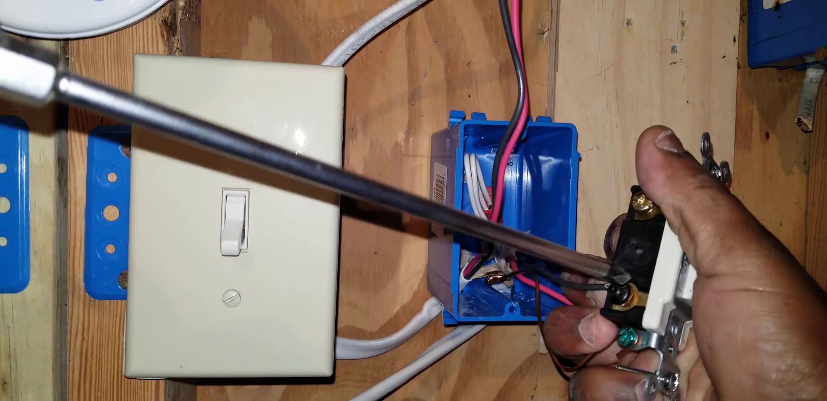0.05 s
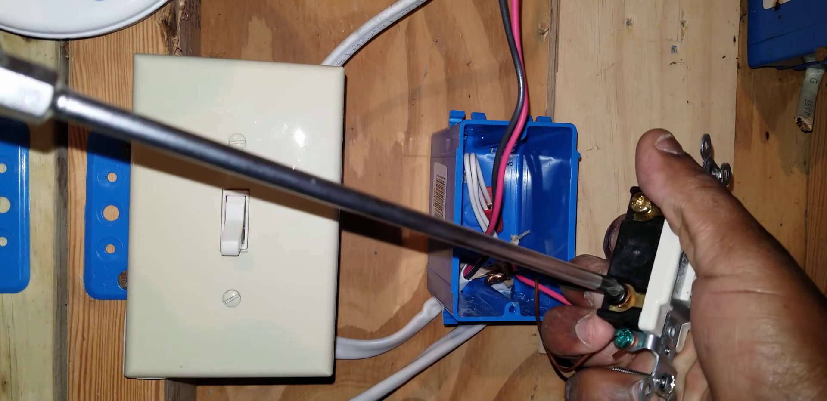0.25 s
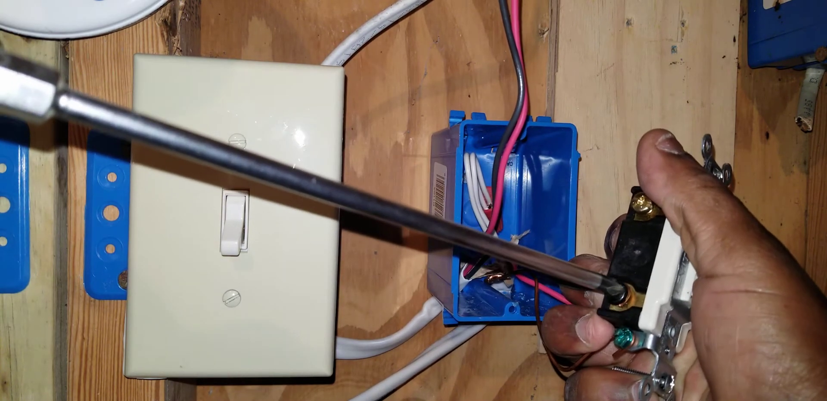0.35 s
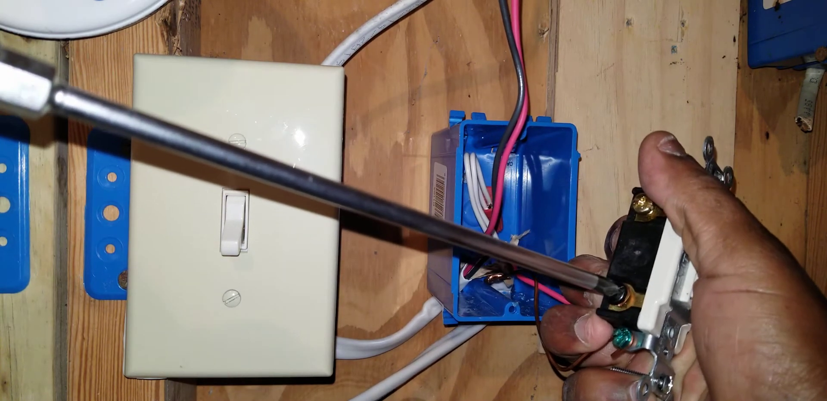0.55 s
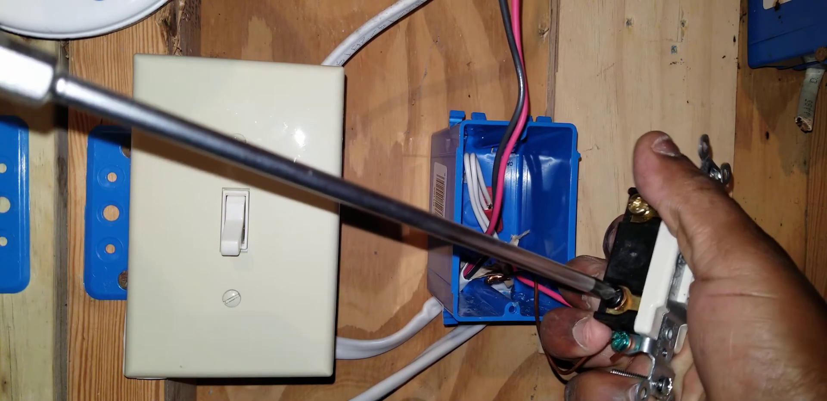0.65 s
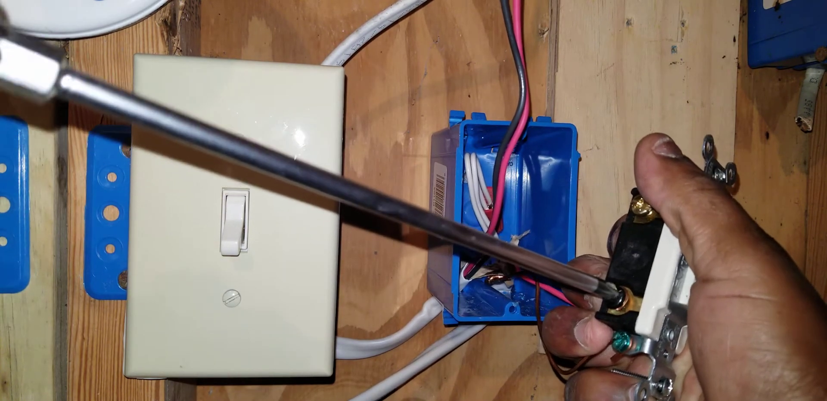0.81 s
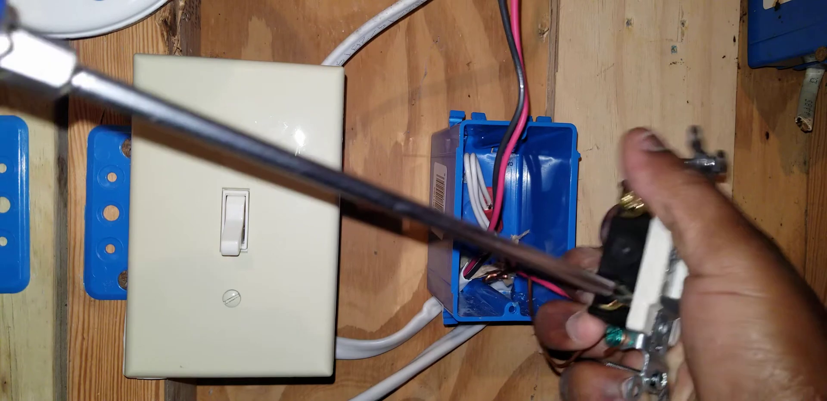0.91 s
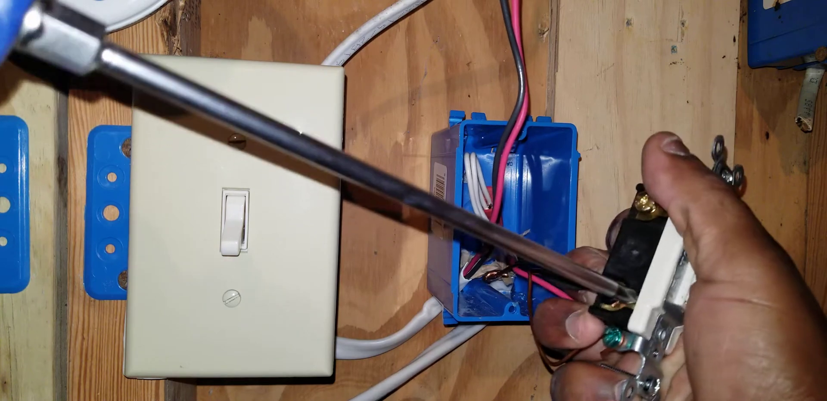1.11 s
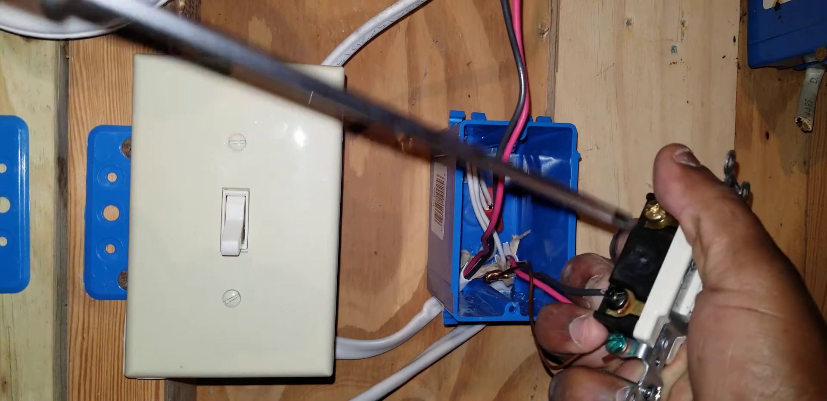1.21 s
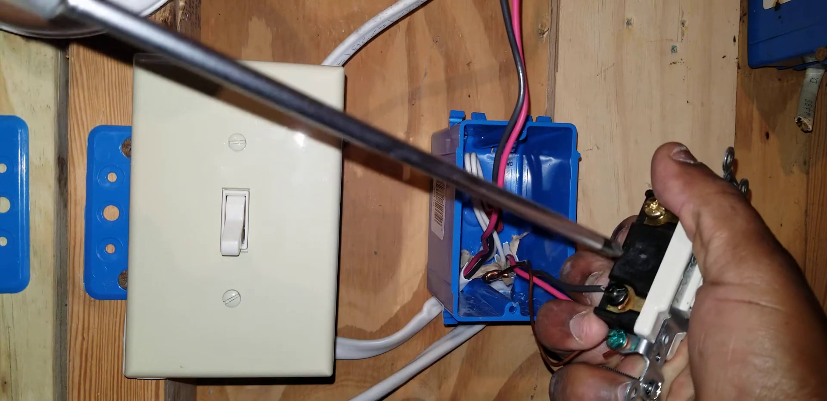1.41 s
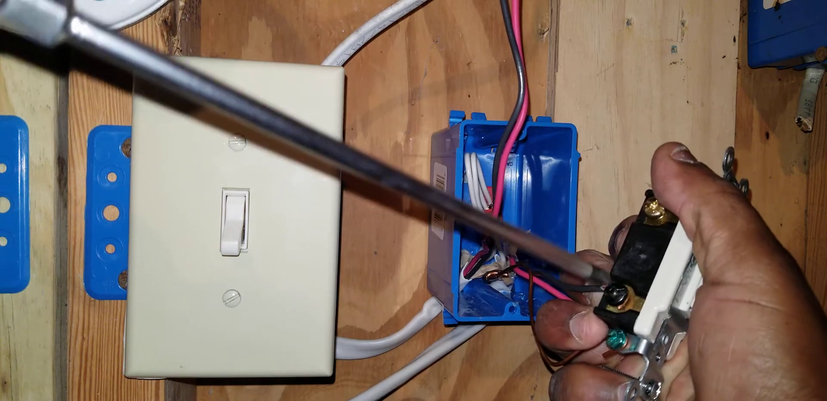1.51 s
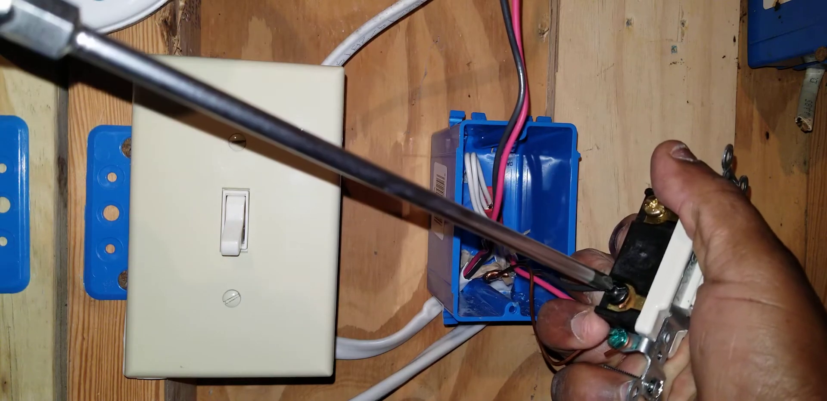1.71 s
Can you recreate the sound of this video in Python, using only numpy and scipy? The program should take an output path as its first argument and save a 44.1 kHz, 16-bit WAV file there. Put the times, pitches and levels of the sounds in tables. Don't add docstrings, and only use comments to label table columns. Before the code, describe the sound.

A screwdriver tip ticks and scrapes on a switch's brass screw, then knocks loudly, over low hum.

```python
import sys
import numpy as np
from scipy import signal
from scipy.fft import rfft, irfft, next_fast_len
from scipy.io import wavfile
from scipy.ndimage import map_coordinates

SR = 44100
rng = np.random.default_rng(int(sys.argv[2]) if len(sys.argv) > 2 else 0)


def undo_db(level):
    steps = np.asarray(level, float) / 20
    return 10 ** steps


def store_wav(level_fs):
    pcm = np.round(np.clip(np.atleast_2d(level_fs), -1, 1) * 32767)
    wavfile.write(sys.argv[1], SR, pcm.T.astype(np.int16))


N = 77175

# multiple of the shaft rate, level in dB rms.
SHAFT_ORDERS = [(2, -46.5), (3, -48.5), (4, -49.5), (5, -48), (6, -60.5), (7, -58.5), (9, -69.5),
                (10, -69.5)]
SHAFT_HZ = 25.23
SWAY_DB, SWAY_RAD, SWAY_PER_S = 2.5, 0.6, 9
# frequency in Hz, density in dB per Hz.
AIR_COLOUR = [(13, -53.5), (22, -6), (38, -7), (129, -15), (156, -25), (260, -29), (304, -30), (366, -30.5),
              (900, -49), (1170, -94), (1980, -120)]
# frequency in Hz, density in dB per Hz.
HISS_COLOUR = [(530, -34.5), (900, -15), (956, -12.5), (1920, -5.5), (2140, -8), (4460, -18.5), (5220, -11),
               (8550, -26), (13000, -14), (16000, -16)]
AIR_DB, HISS_DB = -41.5, -70
# centre in Hz, width in Hz, level in dB.
WHINE_BANDS = [(2200, 450, -78), (5550, 900, -82.5)]
# frequency in Hz, correlation from 0 to 1.
LIKENESS = [(60, 0.92), (180, 0.78), (550, 0.56), (1650, 0.08), (4970, 0.08), (15000, 0.13)]

# start in seconds, peak level in dB, body pitch in Hz, brightness in dB,
# left over right in dB.
TIP_TICKS = [(0.1882, -36, 2120, -12, 3.5), (0.191, -33.5, 3230, -22, 1), (0.193, -49.5, 4310, -30, 7),
             (0.1908, -40.5, 7460, -20, -4), (0.1997, -45, 1960, -2, 6), (0.3445, -45, 3120, -3, 4),
             (0.3761, -36.5, 1730, 2, 6), (0.378, -39, 2440, -10, 11), (0.3777, -37, 3520, -3, -4),
             (.379, -53, 4900, -10, 2), (0.3782, -39, 7340, -30, -6), (0.4063, -37.5, 10380, -6, 13),
             (.4072, -28, 3200, 1, 0.5), (0.4067, -42, 5550, -32, 1), (.409, -39.5, 3890, 5.5, 12),
             (.627, -65, 3720, 11.5, 8), (0.632, -52.5, 4200, 13, -2.5), (.948, -50, 6800, 6, -3),
             (0.9751, -42.5, 7360, 7, -3), (1.0129, -42, 3450, 10, -4), (1.1126, -49.5, 6160, 6.5, -5),
             (1.1189, -47.5, 1810, 0.5, 7), (1.1454, -40.5, 1970, -22, 5), (1.1465, -41.5, 11700, -15, 14),
             (1.1479, -33.5, 3294, -29, -10), (1.1471, -40, 6220, -30, 13), (1.1512, -38, 3500, -15, 4),
             (1.5329, -45, 1530, -18, 9), (1.5321, -29, 2040, -22, -1)]
# start in seconds, peak level in dB,
# body pitch in Hz, brightness in dB, left over right in dB.
SLOT_JUMP = [(.732, -44, 850, -11, -6), (0.8061, -39.5, 1080, -13.5, 5), (.806, -49, 2570, -13.5, 7),
             (0.8723, -26, 1540, -15.5, 2), (0.8743, -15, 1950, -10, 3), (.8752, -17.5, 3000, 5, 1.5),
             (0.8764, -19, 1560, 3.5, -1.5), (0.8816, -9, 2095, -16, 6.5), (0.8834, -22, 1810, -3.5, 1.5),
             (0.8857, -18.5, 1400, 6, -3), (0.8878, -25.5, 2110, 5.5, 0.5), (0.8936, -24, 11700, -2.5, 0.5),
             (.8974, -29, 13500, -3, 4.5)]
# frequency in Hz, level in dB, 60 dB decay in seconds.
BRASS_MODES = [(4200, -15.5, 0.004), (5870, -4.5, 0.0095), (7280, -11, 0.028), (9900, -8.5, 0.016),
               (11610, -7, 0.015), (13500, -12.5, .004)]
TICK_T60_S, JUMP_T60_S = 0.012, 0.008
BODY_RISE_S = 0.00092
CHATTER, BODY_CHATTER_S, BRASS_CHATTER_S = 0.042, 0.0013, 0.0019
CRACK_DB, CRACK_T60_S = -1, 0.012
KNOCK_DB, KNOCK_WIDTH = -3.5, 0.99
UNLIKE = 1
BLUR, BRASS_BLUR = 0.3, 0.12

# start in seconds, level in dB, dullness corner in Hz.
BENCH_BLOWS = [(0.189, -42, 1500), (.406, -37.5, 1492), (0.648, -45.5, 1200), (0.733, -47.5, 2500),
               (0.8051, -45, 3500), (0.874, -21, 1500), (.881, -17.5, 1500), (.886, -16.5, 2500),
               (0.8925, -21.5, 700), (1.147, -43.5, 1504), (1.533, -47.5, 3000)]
# frequency in Hz, level in dB, 60 dB decay in seconds.
BENCH_MODES = [(253, -5, 0.042), (315, -4.5, .05), (527.5, -5, 0.04), (665, 1.5, 0.037), (854, -2, 0.026),
               (1270, -10.5, 0.024)]

# start in seconds, length in seconds, level in dB, pitch in Hz,
# brightness in dB.
TIP_SCRAPES = [
    (0.341, 0.035, -59, 2200, -24),
    (0.503, 0.041, -61, 3300, -13),
    (0.867, 0.014, -42, 1480, -11),
    (1.116, 0.043, -51, 1980, -12),
    (1.127, 0.018, -48, 3330, -4),
]

# frequency in Hz, width in Hz, level in dB.
SQUEAK_MODES = [(1900, 70, -9.5), (3050, 28, -1.5), (3930, 50, -5.5), (5700, 47, -10.5)]
SQUEAK_START_S, SQUEAK_LENGTH_S, SQUEAK_DB = 0.57, 0.02, -56

# time in seconds, thin hiss in dB, dull rub in dB.
FINGER_SLIDE = [
    (.635, -82.5, -69),
    (.68, -77, -67),
    (.705, -58, -64.5),
    (.728, -56, -60.5),
    (.75, -61, -60),
    (.78, -66, -60.5),
    (.82, -68.5, -61),
    (.868, -67.5, -66.5),
]
# frequency in Hz, density in dB per Hz.
SKIN_COLOUR = [(8000, -32), (10500, -14.5), (13500, -4), (15800, -13.5)]
# frequency in Hz, density in dB per Hz.
RUB_COLOUR = [(500, -8.5), (1000, 1.5), (2500, -5.5), (5700, -6), (7000, -11.5), (11000, -15),
              (15000, -18.5)]

# frequency in Hz, level in dB, 60 dB decay
# in seconds.
BOOM_MODES = [(51.1, -20.5, 0.15), (158.6, -43.5, .12), (173.9, -32.5, 0.6), (670, -28, 0.046),
              (843, -27, .04), (3000, -42, .08), (11700, -49.5, 0.11)]
BOOM_START_S, BOOM_PAN_DB = 0.884, -1

# frequency in Hz, 60 dB decay in seconds.
ROOM_T60 = [(150, 0.5), (500, 0.2), (1200, .25), (2500, 0.29), (7000, 0.24), (10000, 0.22), (15000, 0.66)]
# frequency in Hz, level in dB.
ROOM_TONE = [(100, -4), (400, 1.5), (800, 2), (2000, -4), (5000, 0.5), (9000, 1), (15000, -6)]
ROOM_DB = -8

# frequency in Hz, difference in dB.
CLOSE_SHADE = [(250, -1.5), (600, -1), (1500, 2), (2800, -2), (5000, 0), (7500, 7.5), (11000, 9),
               (15000, 5.5)]
HANDS_LAG_S, BENCH_LAG_S = 0.00003, 0.00021
DIP_HZ, DIP_WIDTH_HZ, DIP = 1080, 290, 0.53
LOW_HZ, TOP_HZ = 40.5, 15800
START_S, START_SHARE, STOP_S = 0.003, 0.4, 0.004


def unit(x):
    return x / np.sqrt(np.mean(x ** 2) + 1e-20)


def along(points, hz):
    f, v = np.transpose(points)
    return np.interp(np.log(hz + 1), np.log(f + 1), v)


def wobble(rate):
    return map_coordinates(rng.standard_normal(400), [np.arange(N) * rate / SR])


def filtered(x, response):
    m = next_fast_len(x.shape[-1] + 8192)
    return irfft(rfft(x, m) * response(np.fft.rfftfreq(m, 1 / SR)), m)[..., :x.shape[-1]]


def coloured(shape, colour):
    return filtered(rng.standard_normal(shape), lambda f: undo_db(along(colour, f)))


def peak(f, hz, width_hz):
    return 1j * f * width_hz / (hz * hz - f * f + 1j * f * width_hz)


def rush(gain):
    def mid_side(hz):
        turn = np.arccos(np.clip(along(LIKENESS, hz), -1, 1)) / 2
        return gain(hz) * np.array([np.cos(turn), np.sin(turn)])

    mid, side = filtered(rng.standard_normal((2, N)), mid_side)
    return unit(np.array([mid + side, mid - side]))


def add(out, s, sound, pan_db, right=None, echo=None, lag_s=HANDS_LAG_S):
    def matched(x):
        return sound if x is None else x * np.linalg.norm(sound) / np.linalg.norm(x)

    parts = [undo_db(pan_db / 2) * sound, undo_db(-pan_db / 2) * matched(right), matched(echo)]
    for row, part, late in zip(out, parts, (0, lag_s, 0)):
        at = round((s + late) * SR)
        row[at:at + len(sound)] += part


def rings(modes, t, scatter_db):
    total = 0
    for hz, db, t60 in modes:
        decay = undo_db(db + scatter_db * rng.standard_normal() - 60 * t / t60)
        pitch = hz * (1 + 0.01 * rng.standard_normal())
        total = total + decay * np.sin(2 * np.pi * pitch * t)
    return total


def shortened(modes, share):
    return [(hz, db, t60 * share) for hz, db, t60 in modes]


def hum():
    t = np.arange(N) / SR
    tones = 0
    for order, db in SHAFT_ORDERS:
        level = undo_db(db + 4.5 + SWAY_DB * wobble(SWAY_PER_S))
        phase = 2 * np.pi * (order * SHAFT_HZ * t + rng.random()) + SWAY_RAD * wobble(SWAY_PER_S)
        tones = tones + level * np.sin(phase)
    air = undo_db(AIR_DB) * rush(lambda f: undo_db(along(AIR_COLOUR, f)))
    hiss = undo_db(HISS_DB) * rush(lambda f: undo_db(along(HISS_COLOUR, f)))
    whine = sum(undo_db(db) * rush(lambda f: abs(peak(f, hz, w)) ** 2) for hz, w, db in WHINE_BANDS)
    return tones + air + hiss + whine


def struck(ring, span_s, t):
    grains = np.clip(rng.standard_normal(len(t)) ** 3, -5, 5)
    blows = CHATTER * grains * np.exp(-(t / span_s) ** 2) + (t == 0)
    return signal.fftconvolve(blows, ring)[:len(t)]


def brass(t):
    crack = undo_db(CRACK_DB - 60 * t / CRACK_T60_S) * rng.standard_normal(len(t))
    return struck(rings(BRASS_MODES, t, 3) + crack, BRASS_CHATTER_S, t)


def knock(hz, t60, rise, t):
    noise = filtered(rng.standard_normal(len(t)), lambda f: peak(f, hz, KNOCK_WIDTH * hz) ** 2)
    return undo_db(KNOCK_DB - 60 * t / t60) * unit(noise) / 2 * rise


def ticks():
    out, t = np.zeros((3, N + SR)), np.arange(2000) / SR
    rise = 1 - np.exp(-t / BODY_RISE_S)
    touches = [(row, TICK_T60_S) for row in TIP_TICKS] + [(row, JUMP_T60_S) for row in SLOT_JUMP]
    for (s, db, hz, bright_db, pan_db), t60 in touches:
        shell = [(hz, 0, t60), (hz * 0.76, -8, t60 * 0.66), (hz * 1.339, -10, t60 * 0.5)]
        body = struck(rings(shell, t, 1) * rise + knock(hz, t60, rise, t), BODY_CHATTER_S, t)
        top = np.abs(body).max()
        other = signal.hilbert(body).imag * rng.choice([-1, 1]) + knock(hz, t60, rise, t) * top
        echo = rings(shortened(shell, BLUR), t, 1) + knock(hz, t60, rise, t)
        add(out, s, undo_db(db) * body / top, pan_db, right=body + UNLIKE * other, echo=echo)
        bright = brass(t)
        add(out, s, undo_db(db + bright_db) * bright / np.abs(bright).max(), pan_db,
            right=bright * 0.18 + brass(t), echo=rings(shortened(BRASS_MODES, BRASS_BLUR), t, 1))
    return out[:, :N]


def bench():
    out, t = np.zeros((3, N + SR)), np.arange(SR // 8) / SR
    for s, db, dull_hz in BENCH_BLOWS:
        push = t[:400] * np.exp(-2 * np.pi * dull_hz * t[:400])
        slap = 3 * undo_db(-60 * t / 0.008) * rng.standard_normal(len(t))
        ring = rings(BENCH_MODES, t, 2) + slap
        thud = signal.fftconvolve(ring, push / push.sum())[:len(t)]
        echo = rings(shortened(BENCH_MODES, BLUR), t, 2.8)
        add(out, s, undo_db(db - 5) * thud, 4, echo=echo, lag_s=BENCH_LAG_S)
    return out[:, :N]


def scrapes():
    out, t = np.zeros((3, N + SR)), np.arange(3000) / SR
    for s, length, db, hz, bright_db in TIP_SCRAPES:
        def metal(f):
            return peak(f, hz, 460) + sum(undo_db(g + bright_db) * peak(f, c, 900) for c, g, _ in BRASS_MODES)

        grains = rng.standard_normal(len(t)) * undo_db(2.3 * rng.standard_normal(len(t) // 20).repeat(20))
        swell = np.sin(np.pi * np.clip(t / length, 0, 1))
        add(out, s, undo_db(db) * unit(filtered(grains, metal)) * swell, 1)
    return out[:, :N]


def squeak():
    progress = np.clip((np.arange(N) / SR - SQUEAK_START_S) / SQUEAK_LENGTH_S, 0, 1)
    swell = np.sin(np.pi * progress) ** 0.53
    tone = filtered(rng.standard_normal((3, N)),
                    lambda f: sum(undo_db(db) * peak(f, hz, 2.2 * w) for hz, w, db in SQUEAK_MODES))
    shared = unit(tone + tone[2])
    return undo_db(SQUEAK_DB) * swell * shared * undo_db([[0], [0], [-6]])


def slide():
    s, *levels = np.transpose(FINGER_SLIDE)
    total = 0
    for db, colour in zip(levels, (SKIN_COLOUR, RUB_COLOUR)):
        level = undo_db(np.interp(np.arange(N) / SR, s, db, -120, -120) + 1.5 * wobble(140))
        total = total + level * unit(coloured((3, N), colour))
    return total * undo_db([[2], [-3], [0]])


def boom():
    t = np.clip(np.arange(N) / SR - BOOM_START_S, 0, None)
    ring = rings(BOOM_MODES, t, 0) * (1 - np.exp(-t / 0.0061))
    return ring * undo_db([[BOOM_PAN_DB / 2], [-BOOM_PAN_DB / 2]])


def room(x):
    hz, t, z = signal.stft(rng.standard_normal((2, SR // 2)), SR, nperseg=256)
    decay_db = along(ROOM_TONE, hz)[:, None] - 60 * t / along(ROOM_T60, hz)[:, None]
    tail = signal.istft(z * undo_db(decay_db), SR, nperseg=256)[1]
    late = np.pad(x, (250, 0))[None]
    return signal.fftconvolve(late, tail / np.linalg.norm(tail[0]), axes=1)[:, :N]


def scene():
    close = ticks() + bench() + scrapes() + squeak() + slide()
    hands = filtered(close, lambda f: 1 - DIP * peak(f, DIP_HZ, DIP_WIDTH_HZ))
    near = filtered(hands[:2], lambda f: undo_db(along(CLOSE_SHADE, f) * np.array([[0.5], [-0.5]])))
    block = np.arange(N) // (SR // 10)
    far = sum(room(hands[2] * (block == b)) for b in range(block.max() + 1))
    return near + undo_db(ROOM_DB) * far + boom() + hum()


def top_cut(x):
    return signal.sosfilt(signal.butter(12, 16640, fs=SR, output="sos"), x)


def record(dry):
    def band(hz):
        return 1 / (1 + (hz / TOP_HZ) ** 90) / (1 + (LOW_HZ / (hz + 1)) ** 6)

    t = np.arange(N) / SR
    start = np.clip(START_SHARE + t / START_S, 0, 1)
    stop = np.clip(t[::-1] / STOP_S, 0, 1)
    wide = np.pad(dry * start * stop, ((0, 0), (4096, 4096)), "reflect")
    return top_cut(filtered(wide, band)[:, 4096:-4096])


dry = scene()
out = record(dry)
store_wav(out)
```